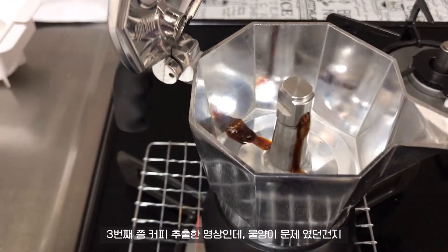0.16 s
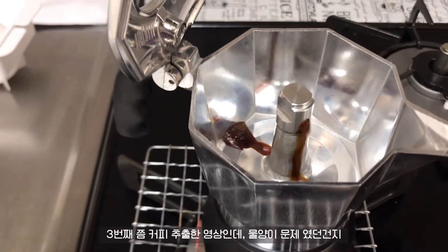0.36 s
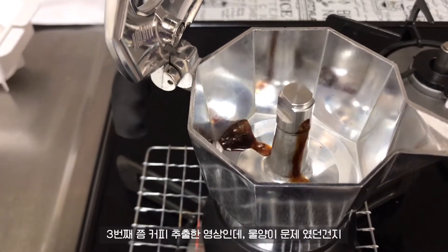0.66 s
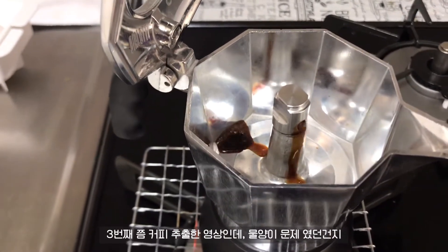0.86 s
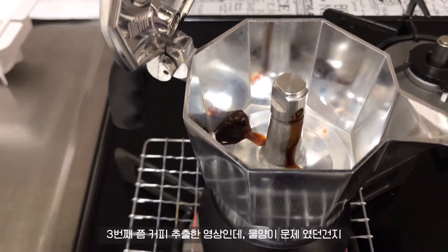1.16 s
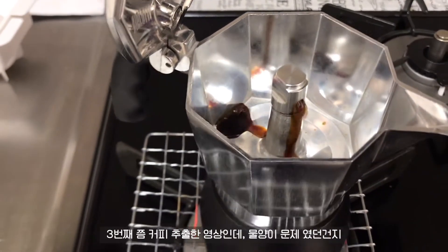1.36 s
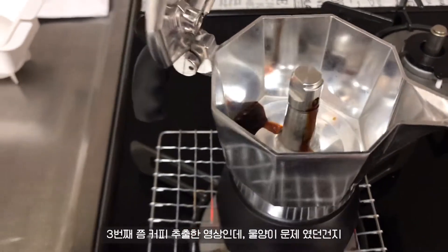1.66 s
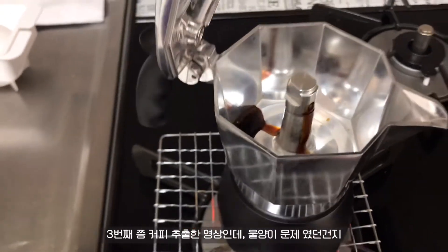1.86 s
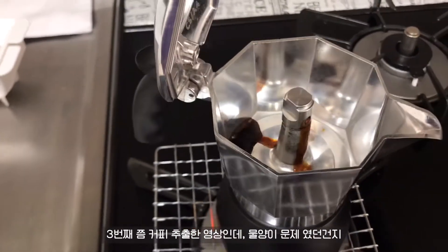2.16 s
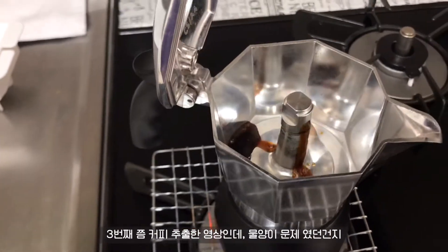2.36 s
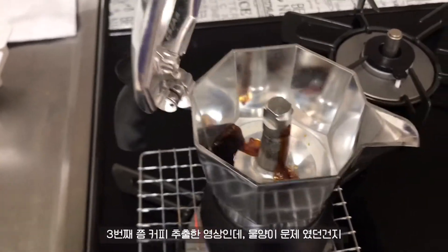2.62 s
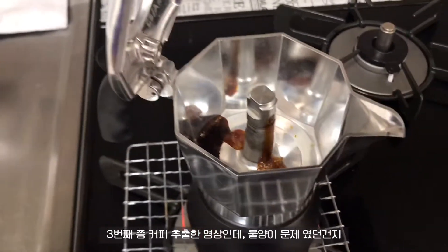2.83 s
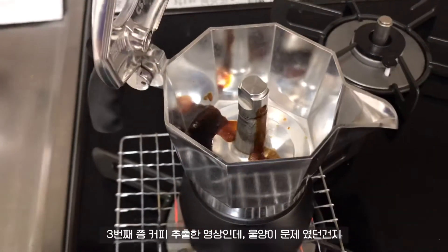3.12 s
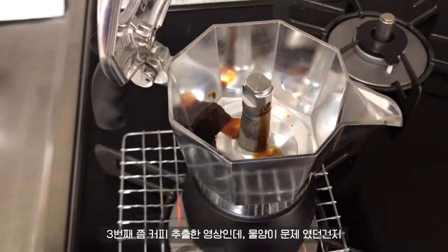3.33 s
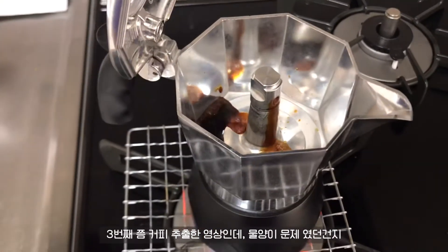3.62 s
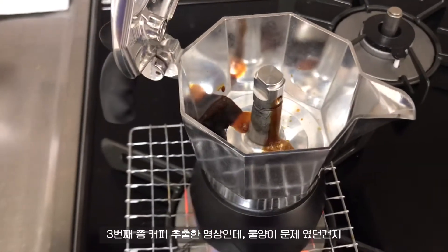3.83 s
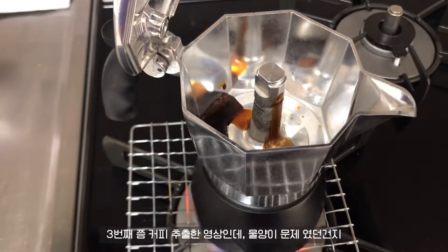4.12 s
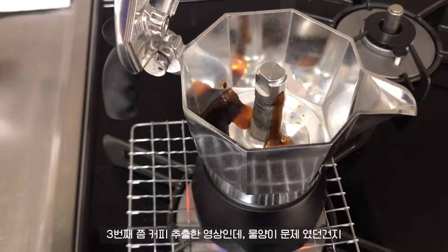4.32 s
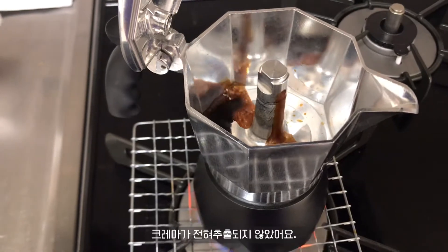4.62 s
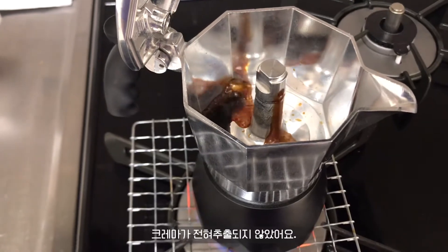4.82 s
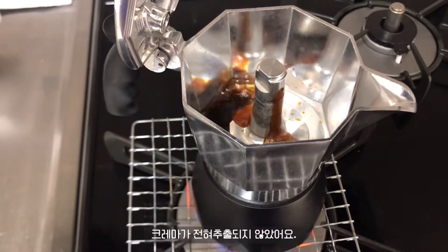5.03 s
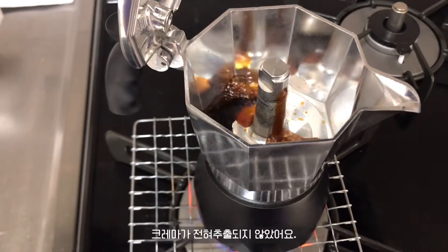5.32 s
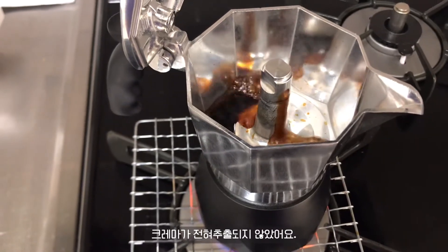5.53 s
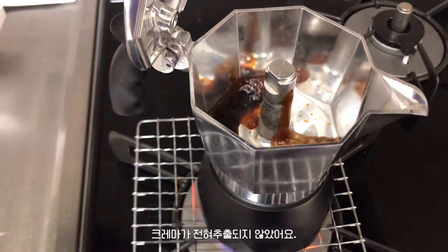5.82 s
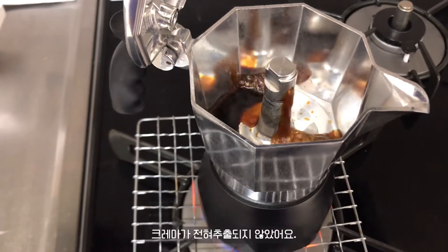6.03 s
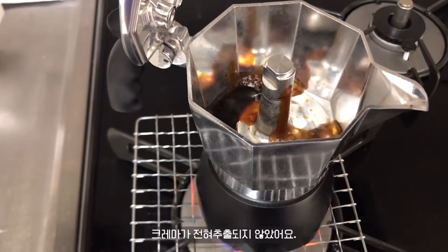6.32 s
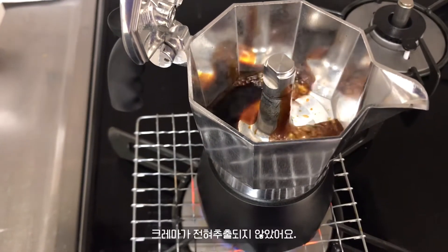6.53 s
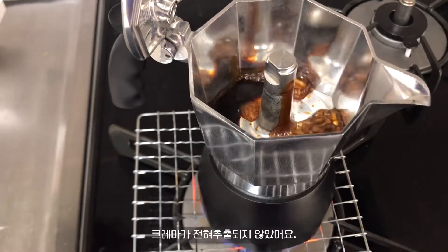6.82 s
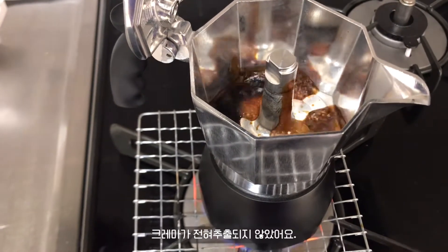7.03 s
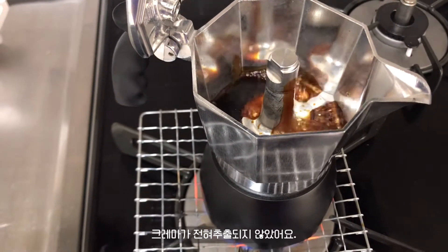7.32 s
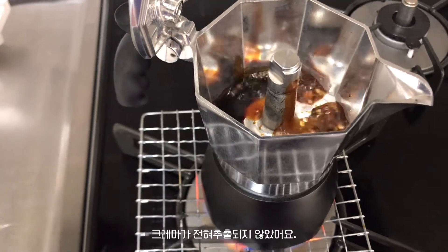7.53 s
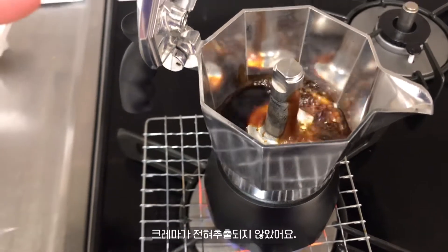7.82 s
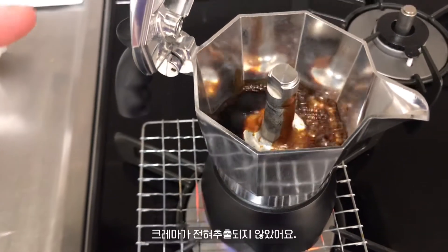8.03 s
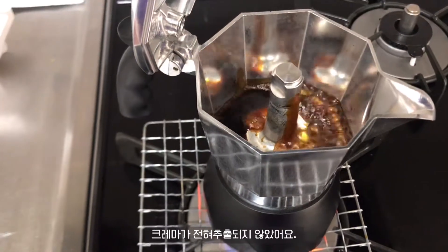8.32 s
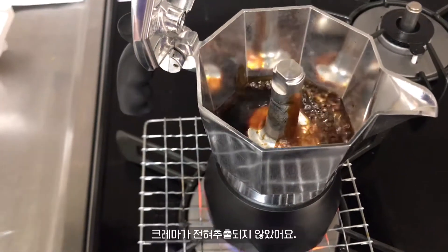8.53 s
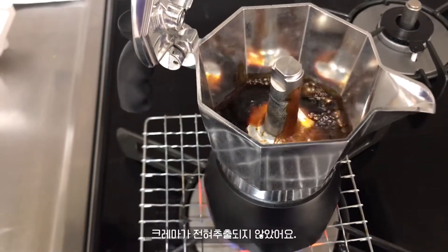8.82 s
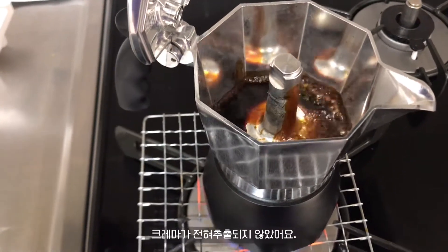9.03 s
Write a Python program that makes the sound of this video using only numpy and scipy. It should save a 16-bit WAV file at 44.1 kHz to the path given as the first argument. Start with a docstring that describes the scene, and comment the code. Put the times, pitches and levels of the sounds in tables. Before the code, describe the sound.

A metal coffee pot brews on a low gas flame, heard close up with short kitchen reverberation. Rapid mid-pitched bubbling runs throughout. Soft puffs give way to spitting bursts and a very short high squeak, then uneven crackling spray with sharp snaps and momentary stalls. As coffee covers the cup floor, steam hiss thickens and the sputtering becomes denser and steadier, still running at the end.

```python
"""A stovetop moka pot brews at close range with its lid open: steam bubbles gurgle, exciting its centre column.
At the spout, films of coffee burst into clumps of crackling noise puffs over a hiss that thickens.
The spray rings in the metal cup, whose resonances pass through four stages as it fills.
Snaps, glugs, spits, soft sputters and one squeak stand out as single events.
Below them lie shaped noise for a low gas flame, a motor's beating hum and a short kitchen reverberation."""
import sys
import numpy as np
from scipy import signal
from scipy.fft import rfft, irfft, next_fast_len
from scipy.io import wavfile
from scipy.ndimage import uniform_filter1d, map_coordinates

SR = 44100
rng = np.random.default_rng(int(sys.argv[2]) if len(sys.argv) > 2 else 0)


def materialize(psi):
    """Save the field psi as 16-bit PCM at rate SR to the path in sys.argv[1].

    A 1-D psi becomes a single channel; in a 2-D psi each row is a channel.
    """
    bounded = np.clip(np.atleast_2d(psi).T, -1, 1)
    quanta = np.round(bounded * 32767).astype(np.int16)
    wavfile.write(sys.argv[1], SR, quanta)


N = 404397

# Spectrum of gas flame and kitchen air: frequency_hz, relative_level_db
FLAME_SPECTRUM = [(20, -28), (35, -26), (55, 1), (78, 2.5), (125, -5.5), (170, -6.5), (250, -7), (330, -4),
                  (500, -8.5), (1500, -29), (4000, -19), (16000, -21)]
# Reverberation of the kitchen: frequency_hz, t60_s
KITCHEN_DECAY = [(200, 0.96), (1500, 0.44), (6000, 0.095), (15000, 0.072)]

# Resonances, with half widths taken at -6 dB: centre_hz, half_width_hz, relative_level_db
# the column and boiler
COLUMN_MODES = [(250.4, 19, -12), (265, 135, -17), (601, 33, -13.5), (701, 49, -8.5), (891, 74, -7),
                (1004, 26, -9.5), (1125, 65, -4), (1241, 100, -7), (1330, 83, -6), (1414, 35, -0.5),
                (1572, 140, -4), (1670, 9.5, -10), (1818, 153, -8), (1884, 23, -22), (2037, 120, -14),
                (2336, 280, -14.5)]
# the wet spout
SPOUT_MODES = [(2400, 400, -18), (3220, 310, 5), (4150, 1300, -2.5)]
# the spout and cup at four stages of filling
EMPTY_CUP_MODES = [(3260, 170, 4), (4170, 420, 0), (5500, 160, -10), (7000, 540, -16.5), (8750, 926, -17),
                   (9300, 51, -6), (11136, 500, -19), (12100, 60, -9), (13300, 690, -19),
                   (14839, 1192, -20)]
WETTED_CUP_MODES = [(3230, 230, -6), (4230, 590, -12.5), (5620, 260, -11), (6770, 500, -6), (7220, 156, 2),
                    (8620, 470, -2.5), (9500, 1700, -10.5), (11200, 180, -6), (12740, 690, -8),
                    (14100, 345, -4), (15000, 800, -9)]
PUDDLE_CUP_MODES = [(3185, 264, -0.5), (4290, 630, -0.5), (5520, 570, -5), (7330, 550, 0.5),
                    (8585, 380, -5.5), (9580, 610, -4), (11500, 470, -8.5), (12600, 548, -8),
                    (14200, 1000, -3.5), (15400, 567, -17.5)]
COVERED_CUP_MODES = [(3240, 240, 0), (4220, 520, -3.5), (5570, 4100, -7.5), (7470, 500, 1), (8840, 260, -2),
                     (9550, 650, -2.5), (11200, 650, -7), (12937, 1500, -9), (14500, 1170, -2),
                     (15700, 360, -19)]
# Filling of the cup: time_s, stage (0 to 3)
CUP_FILLING = [(0, 0), (.47, 0), (.52, 1), (2.65, 1), (2.85, 2), (5.1, 2), (5.7, 3), (9.17, 3)]

# Strength of the bubbling in the column: time_s, gain_db
BUBBLING_STRENGTH = [(0, -32), (.3, -35), (.9, -35), (1.15, -38), (1.3, -35.5), (1.6, -38.5), (2.2, -37),
                     (2.45, -40), (3.1, -39), (3.55, -38.5), (4.02, -41.5), (4.07, -37.5), (4.3, -39),
                     (5.0, -37), (5.2, -37), (6.6, -36.5), (7.75, -37), (9.17, -34.5)]
# Deep and bright pops added as the bubbling opens the flow: time_s, gain_outside_core_db
BUBBLING_BREADTH = [(0, -8.5), (.8, -8), (1.3, -5.5), (3.9, -4), (4.1, -0.5), (9.17, -4)]
# Running spray at the spout: time_s, coarse_spatter_gain_db, fine_mist_gain_db
RUNNING_SPRAY = [(0, -51, -45.5), (.35, -54.5, -51), (.75, -59, -50.5), (1.18, -50, -51), (1.4, -42, -41),
                 (2.25, -40.5, -40.5), (2.5, -43.5, -42.5), (3.2, -43, -43.5), (3.65, -43.5, -43),
                 (3.85, -48, -44), (4.1, -43.5, -40.5), (4.6, -45.5, -44), (5.45, -44.5, -43),
                 (5.9, -44.5, -40), (6.9, -43.5, -40.5), (7.7, -44, -43.5), (8.4, -42, -40.5),
                 (9.17, -42.5, -41.5)]
# Uneven spitting, where a negative depth inverts the surges: time_s, surge_depth_db (rms)
SPIT_UNEVENNESS = [(0, 0), (.5, 0), (1.3, 3.5), (2.1, -1.5), (2.24, 0.5), (2.8, 4), (3.6, 6.5), (3.75, 1.5),
                   (4.4, 2), (5.2, 2.5), (9.17, 3)]
# Separate spurts of coffee: start_s, length_s, coarse_spatter_gain_db, fine_mist_gain_db
COFFEE_SPURTS = [(0.514, 0.058, -36.5, -38.5), (0.604, 0.025, -33.5, -37.5), (0.685, 0.028, -35.5, -37),
                 (.791, 0.024, -33.5, -35), (0.841, 0.13, -36.5, -39.5), (0.998, 0.062, -42.5, -45),
                 (1.079, 0.053, -39.5, -40), (1.209, .03, -40.5, -49), (1.255, 0.059, -38.5, -35.5),
                 (1.348, 0.031, -36, -38), (1.409, 0.041, -42, -39), (1.478, 0.028, -37, -38),
                 (1.603, 0.019, -35, -32), (1.655, 0.057, -47, -42), (1.94, 0.054, -51, -45),
                 (2.133, 0.037, -36, -44), (2.203, .08, -40.5, -34), (2.63, 0.031, -40, -40),
                 (2.863, 0.024, -49, -35), (3.094, 0.039, -37, -37), (3.247, .05, -42, -42),
                 (3.409, 0.11, -44, -40), (3.602, 0.021, -40, -38), (4.057, 0.016, -34, -33),
                 (4.452, 0.034, -43, -47), (4.757, 0.046, -42, -40), (5.06, 0.023, -49, -31.5),
                 (5.592, 0.076, -43, -41), (6.157, 0.014, -45, -30.5), (6.243, 0.037, -42, -40),
                 (6.407, 0.033, -42, -36.5), (6.95, .055, -44, -40), (7.978, .04, -40.5, -45),
                 (8.276, 0.028, -41, -42), (8.332, 0.023, -40, -38), (8.834, 0.13, -43, -40),
                 (9.013, 0.034, -41, -34.5)]
# Momentary chokes, where a negative drop is a rise: start_s, length_s, spray_drop_db, bubbling_drop_db
FLOW_STALLS = [(0.71, 0.047, 3, 1.5), (1.144, 0.068, -3, 3), (1.396, 0.013, 9, 1), (1.527, 0.022, 5, -1.5),
               (1.985, 0.059, 6, 3), (2.112, 0.014, 13, 5), (2.325, 0.029, 11, 7), (2.376, 0.058, 10.5, 2),
               (2.994, 0.014, 0, -2), (3.053, 0.013, 6, 4), (3.733, .045, 4, 4), (3.868, 0.063, 10, 6),
               (4.006, 0.041, 10, 9), (4.429, 0.012, 8, 2), (4.614, 0.11, 1, 3.5), (4.966, 0.065, -1.5, 4),
               (7.28, 0.066, 3, 2), (7.77, 0.094, 1, 3), (8.66, 0.11, 2, 1)]
# Heaves of the column, where a negative rise is a drop: start_s, length_s, bubbling_rise_db
COLUMN_HEAVES = [(3.07, 0.052, 6), (4.044, .135, 2), (4.538, 0.036, 2.5), (4.755, .06, 0.5),
                 (5.747, 0.049, 2), (6.925, 0.079, 2), (8.224, .13, -1)]

# Soft first sputters through the wet spout: centre_s, level_db
FIRST_SPUTTERS = [(.012, -39), (.083, -40.5), (.151, -37.5), (.203, -39), (.257, -44.5), (.368, -42.5),
                  (.416, -39), (.459, -40), (.501, -42), (.765, -40)]
# One trapped bubble squeaking at the spout, a single row: start_s, pitch_hz, level_db, held_length_s
BUBBLE_SQUEAK = (.8807, 3810, -12, .0042)
# Longer spits of wet steam: start_s, initial_level_db, pitch_hz, width_octaves, t60_s
STEAM_SPITS = [(.884, -27, 5600, .7, .06), (1.846, -32, 3200, 1, .19), (3.076, -36, 7400, .6, .07),
               (6.904, -28, 9500, .35, .1), (8.558, -26, 9400, .5, .08)]
# Single loud bursts of the coffee film: start_s, relative_peak_db, pitch_hz
FILM_SNAPS = [(0.7935, -21, 5500), (1.0845, -21, 3220), (1.413, -20, 3380), (1.493, -16, 7230),
              (1.6073, -20, 7090), (1.6575, -18, 8450), (1.846, -14.5, 3220), (2.05, -22, 7200),
              (2.136, -17.5, 7160), (2.145, -14, 4490), (2.2331, -14, 7380), (3.099, -17.5, 7200),
              (3.2597, -21, 3510), (3.494, -21, 3220), (3.5314, -14, 7160), (3.5658, -22, 3360),
              (4.0635, -21.5, 4170), (4.777, -26, 7180), (5.9314, -19.5, 7540), (6.4807, -22, 3390),
              (8.2227, -22, 7760), (8.294, -21.5, 7400), (8.332, -24, 7300)]
# Large bubbles in the column: start_s, relative_push_db
LARGE_BUBBLES = [(0.015, -19.5), (0.409, -20), (0.434, -21), (1.205, -21), (4.753, -23.5), (4.778, -19.5),
                 (5.207, -22), (5.259, -23), (5.408, -22.5), (8.224, -19), (8.294, -19.5), (8.333, -19.5)]

TOP_HZ = 15850  # upper band limit
VALVE_S = 0.01  # time the spout takes to open or close
SWELLS_PER_S = 22  # knots a second in the boiler's wavering push
SURGES_PER_S = 90  # knots a second in the quick pushes of steam
SURGE_SKEW = 0.23  # pushes stand out more than the lulls between them


def amp(db):
    """The decibel law: level to amplitude gain."""
    return 10 ** (np.asarray(db) / 20)


def unit(x):
    """Normalization of power: scale to rms 1."""
    return x / np.sqrt(np.mean(x ** 2) + 1e-20)


def along(points, hz):
    """Interpolation of (Hz, value) points on a logarithmic frequency axis."""
    f, v = np.transpose(points)
    return np.interp(np.log(hz + 1), np.log(f + 1), v)


def curve(rows):
    """Linear interpolation of (s, value) rows to one value per sample."""
    return np.interp(np.arange(N) / SR, *np.transpose(rows))


def wobble(rate):
    """Smooth random fluctuation: a spline through random knots, rate of them a second."""
    knots = rng.standard_normal(N // 20)
    return unit(map_coordinates(knots, [np.arange(N) * rate / SR], mode="wrap"))


def filtered(x, response):
    """Linear filtering: the spectrum of x times a response of frequency."""
    size = next_fast_len(N + SR // 4)
    return irfft(rfft(x, size) * response(np.fft.rfftfreq(size, 1 / SR)), size)[:N]


def resonate(x, peaks, size=8192):
    """Causal resonance: a minimum-phase impulse response is built from the body's power peaks."""
    hz = np.fft.rfftfreq(size, 1 / SR)
    power = sum(amp(db) ** 2 / (1 + ((hz - centre) / width) ** 2) ** 2 for centre, width, db in peaks)
    # folding the cepstrum onto positive time gives minimum phase
    cepstrum = irfft(np.log(power / power.mean() + 1e-12) / 2)
    cepstrum[1:size // 2] *= 2
    cepstrum[size // 2 + 1:] = 0
    impulse = irfft(np.exp(rfft(cepstrum)))
    return signal.fftconvolve(x, impulse)[:N]


def steady(x, span):
    """Sharing of flow among bursts: power is evened out over span seconds."""
    window = np.hanning(int(span * SR))
    power = np.abs(signal.fftconvolve(x ** 2, window / window.sum(), "same"))
    return x / np.sqrt(power + 1e-12)


def scatter(starts, grains):
    """Superposition of grains, one row at each start time."""
    index = (np.asarray(starts) * SR).astype(int)[:, None] + np.arange(grains.shape[1])
    return np.bincount(index.ravel(), grains.ravel(), N)[:N]


def burst_sizes(count):
    """Log-normal distribution of burst amplitudes, with the rare giants capped."""
    return amp(7 * np.minimum(rng.standard_normal(count), 1.9))


def patchy(x, depth_db, size=(7, 14)):
    """Local spectral modulation: neighbouring bands swell and fade as the wet opening changes shape."""
    z = signal.stft(x, nperseg=256)[2]
    field = rng.standard_normal(z.shape)
    for axis in (0, 1, 0, 1):  # smooth over bands, then frames, twice
        field = uniform_filter1d(field, size[axis], axis)
    return signal.istft(z * amp(depth_db * unit(field)), nperseg=256)[1][:N]


def background(flame_db=-56, mains_db=-61, motor_db=-64):
    """Turbulent noise of the flame, and beating between a motor's hum and the mains."""
    t = np.arange(N) / SR
    flame = unit(filtered(rng.standard_normal(N), lambda hz: amp(along(FLAME_SPECTRUM, hz))))
    mains = 2 * np.pi * 50 * t
    slip = 2 * np.pi * .555 * (t - 1.15)  # .555 beats a second, one peaking at 1.15 s
    motor = np.sin(2 * mains) + np.sin(2 * mains - slip)
    return amp(flame_db) * flame + amp(mains_db) * np.sin(mains) + amp(motor_db) * motor


def room(x):
    """Reverberation as exponentially decaying noise, shortest in the treble."""
    hz, t, z = signal.stft(rng.standard_normal(SR // 3), SR, nperseg=256)
    decay = amp(-60 * t / along(KITCHEN_DECAY, hz)[:, None])
    tail = signal.istft(z * decay, SR, nperseg=256)[1]
    delayed = np.pad(x, (SR // 200, 0))  # 5 ms
    return signal.fftconvolve(delayed, tail / np.linalg.norm(tail))[:N]


def gate(start, length):
    """Valve action: a linear rise to 1 at start and a fall after length seconds."""
    t = np.arange(N) / SR
    return np.clip(.5 + np.minimum(t - start, start + length - t) / VALVE_S, 0, 1)


def flow(bubbling_swell_db=0.89, spray_swell_db=1.03, mist_swell_db=1.48):
    """Modulation by a common push that wavers, heaves, chokes and throws out spurts; gains of three flows."""
    swell = wobble(SWELLS_PER_S)
    running = np.array(RUNNING_SPRAY)
    bubbling_db = curve(BUBBLING_STRENGTH) + bubbling_swell_db * swell
    spatter_db = curve(running[:, [0, 1]]) + spray_swell_db * swell
    mist_db = curve(running[:, [0, 2]]) + mist_swell_db * swell
    for start, length, rise_db in COLUMN_HEAVES:
        bubbling_db = bubbling_db + rise_db * gate(start, length)
    for start, length, spray_drop_db, bubbling_drop_db in FLOW_STALLS:
        choke = gate(start, length)
        bubbling_db = bubbling_db - bubbling_drop_db * choke
        spatter_db = spatter_db - spray_drop_db * choke
        mist_db = mist_db - spray_drop_db * choke
    coarse, fine = np.zeros((2, N))
    for start, length, coarse_db, fine_db in COFFEE_SPURTS:
        opening = gate(start, length)
        coarse += amp(coarse_db) * opening
        fine += amp(fine_db) * opening
    # running spray and spurts add in power
    return amp(bubbling_db), np.hypot(amp(spatter_db), coarse), np.hypot(amp(mist_db), fine)


def sealing():
    """Obstruction of flow: around each loud burst the swelling film briefly holds it back."""
    starts = np.array([row[0] for row in [*FILM_SNAPS, *LARGE_BUBBLES, *STEAM_SPITS]])
    hold = np.tile(np.hanning(SR // 45), (len(starts), 1))  # 22 ms, from 15 ms before the burst
    return amp(-5.5 * scatter(np.maximum(starts - .015, 0), hold))


def sputters(width=0.0089):
    """Resonance of the wet spout driven by noise: the first steam pushes through in soft, dull puffs."""
    centres, db = np.transpose(FIRST_SPUTTERS)
    t = np.arange(N) / SR
    swell = sum(gain * np.exp(-((t - centre) / width) ** 2) for centre, gain in zip(centres, amp(db)))
    return swell * unit(resonate(rng.standard_normal(N), SPOUT_MODES))


def squeak():
    """A decaying oscillator: a whistle holds for milliseconds, then sags in pitch and dies away unsteadily."""
    start, hz, db, length = BUBBLE_SQUEAK
    t = np.arange(SR // 8) / SR
    held = 1 / (1 + (t / length) ** 12)
    tail = amp(-14 - 60 * t / .1)  # 60 dB in .1 s
    unsteadiness = .04 * (1 - held) * wobble(500)[:len(t)]
    pitch = hz * (1 - 1.6 * t + unsteadiness)
    tone = np.sin(2 * np.pi * np.cumsum(pitch) / SR)
    return amp(db) * scatter([start], (np.maximum(held, tail) * tone)[None])


def spits():
    """Exponential decay of band noise: a slug of coffee tears into a short, fading rasp."""
    t = np.arange(SR // 4) / SR
    hz = np.fft.rfftfreq(len(t), 1 / SR) + 1
    start, db, centre_hz, octaves, t60 = np.transpose(STEAM_SPITS)[:, :, None]
    colour = np.exp(-(np.log2(hz / centre_hz) / octaves) ** 2)
    noise = irfft(rfft(rng.standard_normal((len(start), len(t)))) * colour, len(t))
    rasp = noise / noise.std(axis=1, keepdims=True)
    return scatter(start[:, 0], amp(db - 60 * t / t60) * rasp)


def glugs(life=0.00032):
    """Impulsive excitation of a resonator: a large bubble gives the column one strong push."""
    starts, db = np.transpose(LARGE_BUBBLES)
    t = np.arange(SR // 150) / SR
    pop = t / life * np.exp(-t / life) * np.sin(2 * np.pi * 1400 * t)
    sound = resonate(scatter(starts, amp(db)[:, None] * pop), COLUMN_MODES)
    return sound / np.abs(sound).max() * amp(db.max() + 1.0)


def cup(x):
    """Crossfading resonance: the cup's colour passes from stage to stage as coffee covers its floor."""
    fill = curve(CUP_FILLING)
    stages = [EMPTY_CUP_MODES, WETTED_CUP_MODES, PUDDLE_CUP_MODES, COVERED_CUP_MODES]
    return sum(np.clip(1 - np.abs(fill - k), 0, 1) * resonate(x, peaks) for k, peaks in enumerate(stages))


def snaps(body_db=-12, direct_db=-9, level_db=-4.0):
    """Impulsive band noise from the largest films, heard directly and through cup and column."""
    starts, db, centre_hz = np.transpose(FILM_SNAPS)
    t = np.arange(SR // 90) / SR
    hz = np.fft.rfftfreq(len(t), 1 / SR) + 1
    u = t / .0007  # time in units of the crack's life
    colour = .3 + np.exp(-np.log2(hz / centre_hz[:, None]) ** 2)
    noise = irfft(rfft(rng.standard_normal((len(starts), len(t)))) * colour, len(t))
    crack = u * np.exp(-u) * noise
    cracks = scatter(starts, amp(db)[:, None] * crack / np.abs(crack).max(axis=1, keepdims=True))
    sound = cup(cracks) + amp(body_db) * resonate(cracks, COLUMN_MODES) + amp(direct_db) * cracks
    return sound * amp(level_db)


def spray(surge, wetness, mistiness, life=0.0011, hiss_db=-8, hiss_rise_db=2.5, spatter_db=-0.6,
          body_db=-14, count=5000):
    """Superposed noise puffs: films burst in clumps over steam that grows as the boiler empties."""
    when, age, pitch = rng.random((count, 3)).T
    size = burst_sizes(count)
    t = np.arange(SR // 147) / SR
    hz = np.fft.rfftfreq(len(t), 1 / SR) + 1
    centre_hz = 2500 * 7 ** pitch[:, None]
    colour = np.exp(-(np.log2(hz / centre_hz) / 1.5) ** 2)
    noise = irfft(rfft(rng.standard_normal((count, len(t)))) * colour, len(t))
    # a film tears open gradually, so each puff has a rounded start
    u = t / (life * (0.23 + age[:, None]))
    puffs = size[:, None] * u * np.exp(-u) * noise
    # the hiss rises by hiss_rise_db for each stage of filling
    hiss = amp(hiss_db + hiss_rise_db * curve(CUP_FILLING)) * rng.standard_normal(N)
    jet = (unit(scatter(when * N / SR, puffs)) + hiss) * amp(curve(SPIT_UNEVENNESS) * surge)
    jet = patchy(jet, depth_db=2.0, size=(3, 9))
    ring = cup(jet)
    coarse = filtered(ring, lambda hz: 1 / (1 + (hz / 5800) ** 14))
    spatter = steady(coarse, span=0.058) * wetness * amp(spatter_db)
    mist = steady(ring - coarse, span=0.061) * mistiness
    # each burst also kicks the column below the spout
    kick = unit(resonate(np.abs(jet) * rng.standard_normal(N), COLUMN_MODES)) * wetness * amp(body_db)
    return spatter + mist + kick


def gurgle(surge, bubbling, life=0.00029, clump_db=0.86, surge_db=2.0, wash_db=-7, count=9000):
    """Bubble collapse exciting a resonator: pops of a few cycles, favoured near the column's own pitch."""
    when, pitch, age = rng.random((count, 3)).T
    size = burst_sizes(count)
    t = np.arange(SR // 150) / SR
    u = t / (life * (.5 + age[:, None]))
    hz = 650 + 1900 * pitch[:, None]
    pops = size[:, None] * u * np.exp(-u) * np.sin(2 * np.pi * hz * t)
    # countless faint bubbles merge into a wash that also reaches the bass
    wash = unit(filtered(rng.standard_normal(N),
                         lambda f: 1 / (1 + (f / 2500) ** 2) + 0.4 / (1 + (f / 480) ** 4)))
    clumping = amp(clump_db * wobble(45) + surge_db * surge)
    churn = (unit(scatter(when * N / SR, pops)) + amp(wash_db) * wash) * clumping
    voice = steady(resonate(churn, COLUMN_MODES), span=0.067)
    core = filtered(voice, lambda f: np.exp(-(np.log2((f + 1) / 1220) / .5) ** 2))
    return (core + (voice - core) * amp(curve(BUBBLING_BREADTH))) * bubbling


def scene(room_db=-12):
    """Common excitation: flow and quick steam surges drive gurgle and spray; room and background surround them."""
    push = wobble(SURGES_PER_S)
    # the narrow column caps the strongest surges
    surge = unit(np.tanh((push + SURGE_SKEW * (push ** 2 - 1)) / 2))
    bubbling, wetness, mistiness = flow()
    brewing = (gurgle(surge, bubbling) + spray(surge, wetness, mistiness)) * sealing()
    pot = brewing + snaps() + spits() + glugs() + sputters()
    whistle = squeak()
    # the spout beams its whistle at the microphone, so less of it reaches the walls
    reverberation = amp(room_db) * room(pot + .5 * whistle)
    return (pot + whistle + reverberation + background())[None]


def record(dry):
    """Band limitation: an ideal low-pass keeps nothing above TOP_HZ."""
    return filtered(dry[0], lambda hz: hz < TOP_HZ)[None]


dry = scene()
out = record(dry)
materialize(out)
```